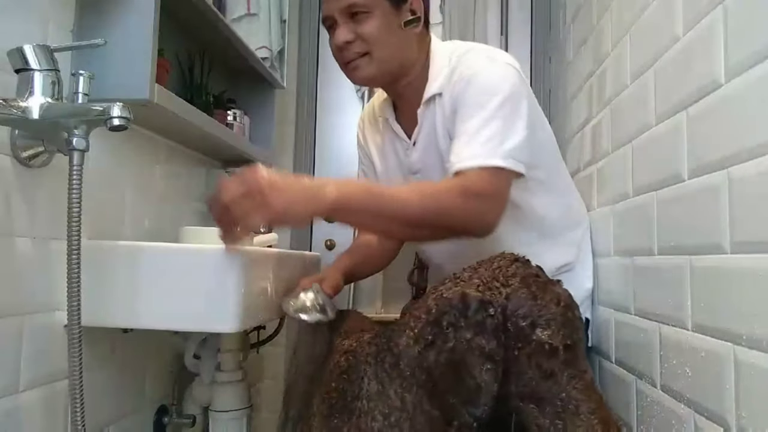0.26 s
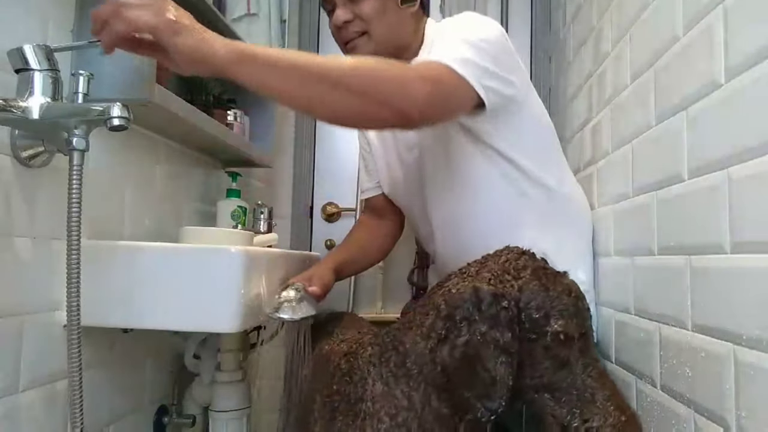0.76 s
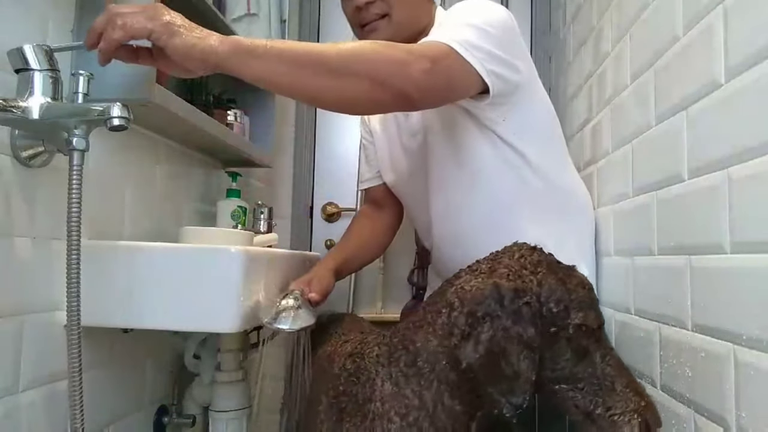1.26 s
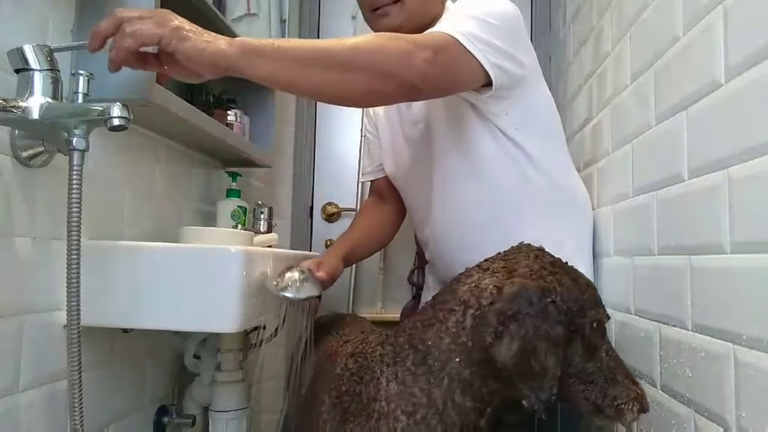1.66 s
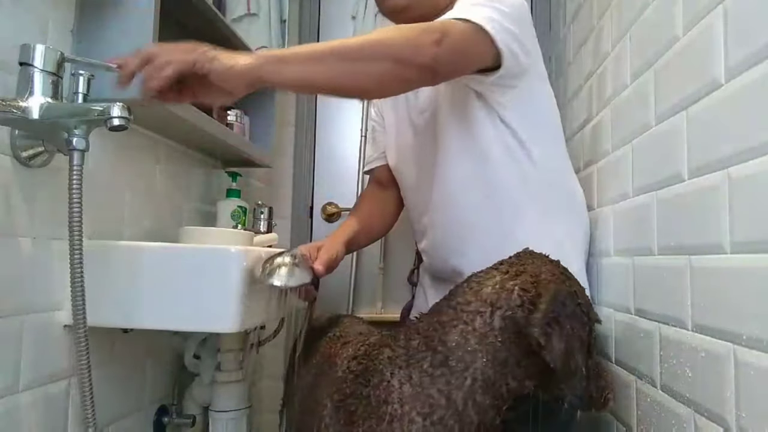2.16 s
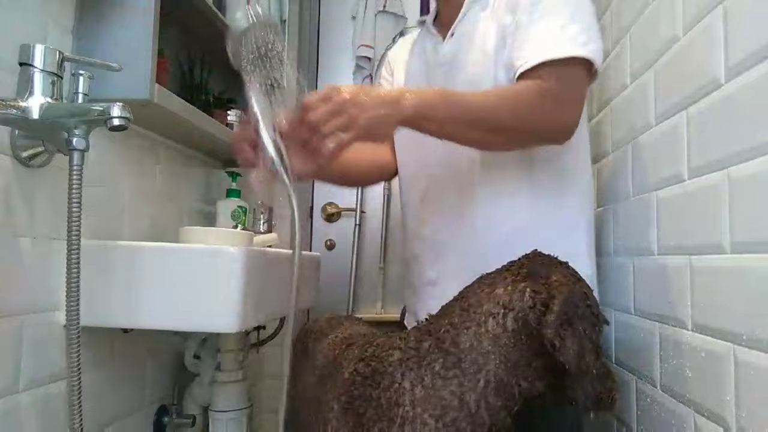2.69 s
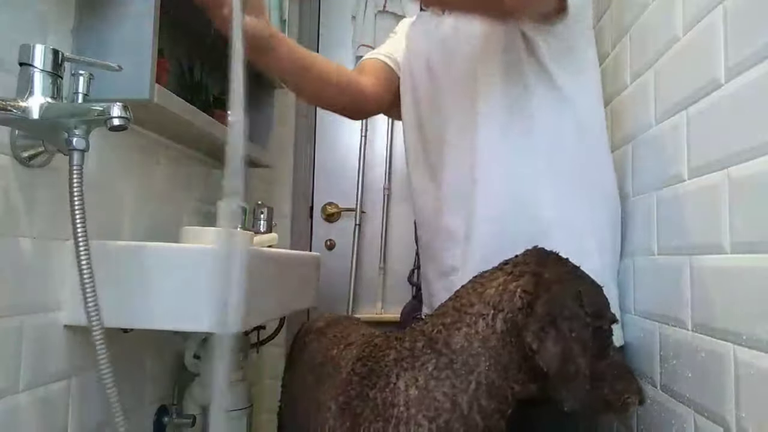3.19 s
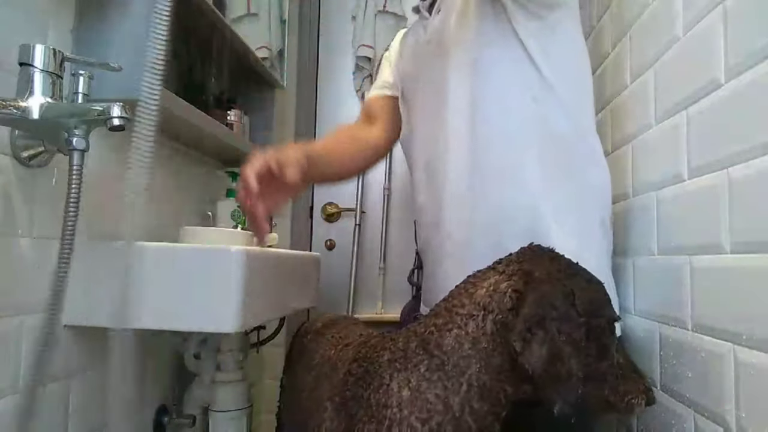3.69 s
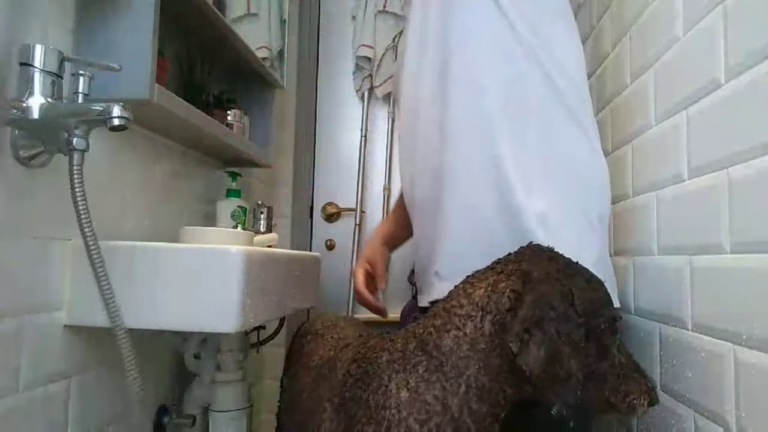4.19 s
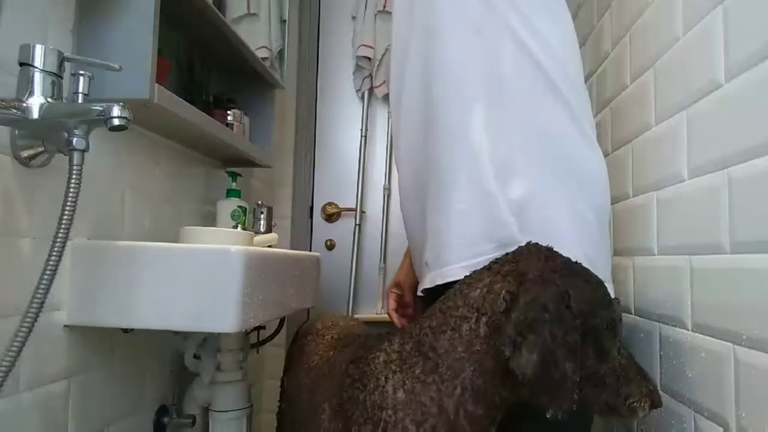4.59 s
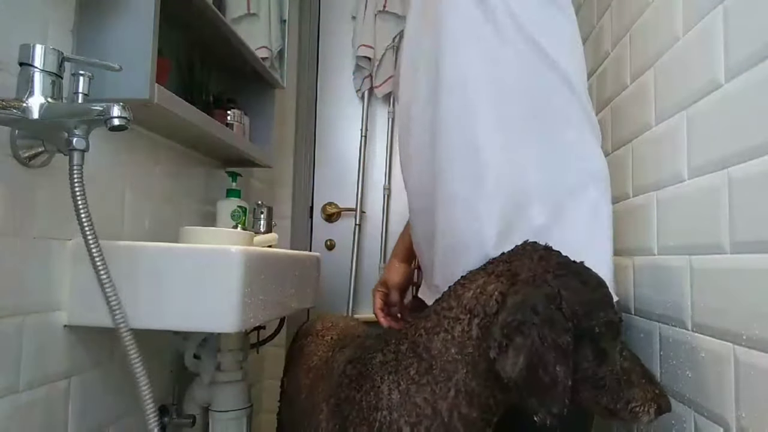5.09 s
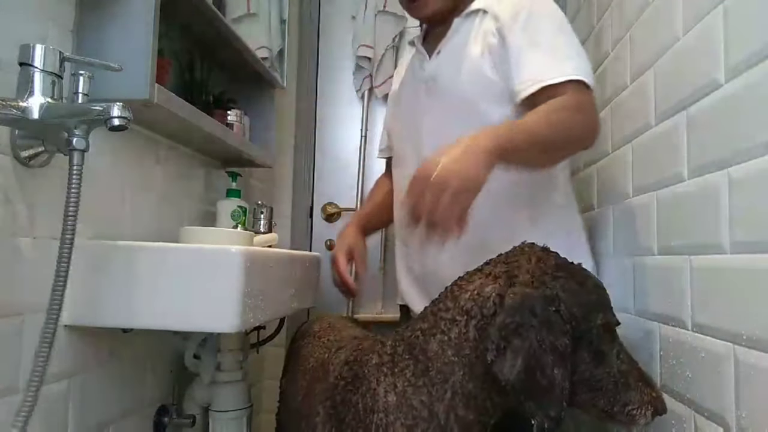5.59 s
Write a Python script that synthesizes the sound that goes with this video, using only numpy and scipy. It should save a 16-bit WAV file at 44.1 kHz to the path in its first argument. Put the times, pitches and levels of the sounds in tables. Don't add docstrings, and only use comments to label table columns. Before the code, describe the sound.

A small, hard tiled bathroom heard through a close phone microphone, bright around the upper treble, with faint low room hum. At first only weak dribble and a few spurts; from about 0.5 s a hand shower hisses in uneven bursts onto a dog's soaked coat, with crisp spatters near 0.55, 0.8, 1.1 and 1.3 s, run-off pattering and bubbly, squirting gurgles. Around 1.5 s the jets drop to a thin trickle, with drain gurgles and a splash near 2.05 s. From 2.4 to 4.2 s it is nearly quiet: tiny separate drips and soft boomy bumps and shuffles. At 4.28 s the ribbed metal hose slaps and clinks on tile with a slop of water; a harder clatter and scrape comes at 4.67 s, rattling until about 4.9 s. Sparse drips follow, with a lone tick near 5.1 s and a dull thump near 5.4 s. Echoes are very short.

```python
import sys
import numpy as np
from scipy import signal
from scipy.io import wavfile
from scipy.ndimage import uniform_filter1d

SR = 44100
rng = np.random.default_rng(int(sys.argv[2]) if len(sys.argv) > 2 else 0)


def boost(x):
    u = np.asarray(x, float) / 20
    return 10 ** u


def inscribe(sig):
    pcm = np.round(np.clip(np.atleast_2d(sig).T, -1, 1) * 32767)
    wavfile.write(sys.argv[1], SR, pcm.astype(np.int16))


N = 257984
FRAME_S = np.arange(N // 64 + 8) * 64 / SR

GATE_HZ = [1000, 2500, 5000, 7700, 9500, 12000, 15700]


def evened(x):
    return x / np.sqrt(np.mean(x ** 2) + 1e-20)


def read(points, hz):
    f, value = np.transpose(points)
    return np.interp(np.log(hz + 1), np.log(f + 1), value)


def add(mix, s, sound):
    part = mix[round(s * SR):][:len(sound)]
    part += sound[:len(part)]


def together(*db):
    return np.sqrt(sum(boost(d) ** 2 for d in db))


def column(tables, t, order, silent=-110):
    out = np.full(len(t), float(silent))
    for rows in tables:
        rows = np.array(rows)
        inside = (t >= rows[0, 0]) & (t <= rows[-1, 0])
        out[inside] = np.interp(t[inside], rows[:, 0], rows[:, order])
    return out


def drifting(noise, bins, frames):
    return evened(uniform_filter1d(uniform_filter1d(noise, size=bins, axis=0), size=frames, axis=1))


def resonate(x, hz, width):
    turn = np.exp(2j * np.pi * np.cumsum(hz * np.ones(len(x))) / SR)
    r = np.exp(-np.pi * width / SR)
    return 2 * (turn * signal.lfilter([1 - r], [1, -r], x / turn + 1e-18)).real


def droplets(per_s, spread_db, share):
    hit = rng.random(N) < per_s / SR
    size = boost(spread_db * np.minimum(rng.exponential(1, N), 4)) * hit
    grain = rng.standard_normal(120) * np.exp(-np.arange(120) / 25)
    share = np.clip(share, 0, 1)
    impacts = evened(signal.oaconvolve(size, grain)[:N])
    return evened(share * impacts + (1 - share) * rng.standard_normal(N))


def banded(x, gains, patchy_db):
    # frequency in Hz, level in dB per Hz.
    jet_colour = [(590, -47), (1000, -34.5), (1160, -42), (1430, 1.5), (2000, -3), (2660, -6), (3850, -8.5),
                  (4850, -6), (6320, -3.5), (11500, -21.5), (12600, -21), (15700, -23)]
    bin_hz = np.fft.rfftfreq(256, 1 / SR)
    z = signal.stft(x, nperseg=256, noverlap=192)[2]
    patches = drifting(rng.standard_normal(z.shape), bins=4, frames=30)
    z = z / np.sqrt(np.mean(abs(z) ** 2, axis=1, keepdims=True)) * boost(patchy_db * patches)
    shape = np.zeros(z.shape)
    for lo, hi, gain in zip(GATE_HZ, GATE_HZ[1:], gains):
        band = uniform_filter1d(1. * (bin_hz >= lo) * (bin_hz < hi), size=3)
        tint = boost(read(jet_colour, bin_hz)) * band
        shape += np.outer(tint / np.linalg.norm(tint), gain[:z.shape[1]])
    return signal.istft(z * shape, nperseg=256, noverlap=192)[1][:N]


def room_tone():
    # frequency in Hz, level in dB per Hz.
    room_colour = [(12, -47), (20, -36.5), (107, -4), (126, -10.5), (283, -27.5), (418, -25.5), (481, -29),
                   (710, -29.5), (913, -36.5), (1110, -35.5), (1240, -39.5), (1990, -41), (4230, -46.5),
                   (6610, -44), (15700, -65)]
    room_db = -56
    frames, hz = N // 512 + 6, np.fft.rfftfreq(2048, 1 / SR)
    a, b, noise = rng.standard_normal((frames, 1025, 3)).T
    patches = drifting(noise, bins=40, frames=6)
    modes_db = 2.95 * np.exp(-((hz - 100) / 18) ** 2)
    modes_db -= 7.4 * np.exp(-((hz - 140) / 18) ** 2)
    modes_db += 5.5 * np.exp(-((hz - 190) / 30) ** 2)
    colour_db = np.maximum(read(room_colour, hz), -59) + modes_db
    z = (a + 1j * b) * boost(colour_db[:, None] + 2.0 * patches * (hz > 300)[:, None])
    return boost(room_db + 2.5) * evened(signal.istft(z, nperseg=2048, noverlap=1536)[1][:N])


def shuffles():
    # time in seconds, level in dB, pitch in Hz.
    puffs = [(0.105, -59, 143), (0.469, -46, 143), (0.742, -50, 159), (0.867, -55, 143), (1.508, -47, 143),
             (1.79, -49, 183), (1.838, -47, 180), (2.1, -47, 180), (2.764, -52, 143), (2.937, -42.5, 151),
             (3.099, -49, 148), (3.208, -46, 153.4), (3.568, -47, 143), (3.694, -46.5, 143),
             (3.765, -46, 155), (3.924, -49, 176), (4.28, -36.5, 141), (4.35, -43, 170), (4.674, -43, 392),
             (4.835, -39.5, 184), (5.004, -47, 170), (5.078, -49.5, 173), (5.376, -47, 144),
             (5.746, -46, 180)]
    out, count = np.zeros(N), round(.07 * SR)
    for s, db, hz in puffs:
        puff = resonate(resonate(rng.standard_normal(2 * count), hz, 70), hz, 140)[count:]
        add(out, max(s - .015, 0), boost(db - 11.0) * evened(puff) * np.hanning(count))
    return out


def bumps():
    # time in seconds, peak in dB.
    mode_knocks = [(0.33, -47), (0.475, -29.5), (0.629, -34.5), (0.861, -36.5), (0.932, -40.5),
                   (1.148, -42), (1.562, -43), (1.694, -43), (2.247, -45), (2.761, -40), (2.848, -38.5),
                   (2.895, -36.5), (3.004, -40), (3.107, -36.5), (3.161, -36), (3.33, -44), (3.383, -35),
                   (3.419, -41), (3.51, -46), (4.149, -41.5), (3.482, -45.5), (3.576, -37), (3.652, -35.5),
                   (3.746, -36), (3.946, -39), (4.266, -33.5), (4.636, -43), (4.81, -45.5), (4.999, -46),
                   (5.085, -41), (5.383, -30), (5.501, -40), (5.547, -39.5), (5.659, -40), (5.738, -33.5)]
    # time in seconds, peak in dB, pitch in Hz.
    thuds = [(0.0063, -42, 81), (0.063, -45, 110), (2.109, -50, 53), (6.4, -44, 65), (4.105, -53, 84),
             (4.102, -35, 87.5), (4.9, -44, 51.6), (4.829, -40, 188), (4.272, -43, 172), (5.797, -51, 67),
             (1.79, -47, 66), (1.8, -42.5, 95), (1, -49, 58), (9.5, -40, 40), (2.63, -47, 92)]
    mode_hz, scatter_share = 100, .05
    knocks = [(s, db, mode_hz * (1 + scatter_share * rng.standard_normal())) for s, db in mode_knocks]
    knocks = knocks + thuds
    out, t = np.zeros(N), np.arange(round(.052 * SR)) / SR
    phases = rng.random((len(knocks), 2))
    for (s, db, hz), (a, b) in zip(knocks, phases):
        wave = np.sin(2 * np.pi * (hz * t + a))
        wave += 0.16 * np.sin(2 * np.pi * (1.683 * hz * t + b))
        wave += 0.14 * np.sin(2 * np.pi * (0.6 * hz * t + b))
        add(out, max(s - .008, 0), boost(db) * wave * np.hanning(len(t)))
    return out


def gurgle():
    # time in seconds, peak in dB,
    # pitch in Hz, length in seconds.
    blips = [(0.388, -38.5, 1544, 0.059), (0.429, -33, 2400, 0.018), (0.482, -36, 1390, 0.04),
             (0.526, -43, 1346, 0.048), (0.5735, -44, 1350, 0.055), (0.686, -44, 1570, 0.063),
             (0.9, -42.5, 1560, 0.08), (0.946, -39.5, 1800, 0.03), (1.056, -29, 1630, 0.069),
             (1.118, -37, 1360, 0.12), (1.235, -35, 2300, 0.022), (1.449, -42.5, 1730, 0.05),
             (1.663, -39.5, 2100, 0.037), (1.734, -42.5, 2140, 0.066), (1.826, -34, 1580, 0.12),
             (1.892, -38, 1496, 0.18), (2.085, -36.5, 2560, 0.1), (2.103, -39.5, 1426, 0.12),
             (2.1506, -38.5, 2280, 0.054), (2.271, -40, 2410, 0.053), (2.32, -46, 1440, 0.026),
             (3.986, -57, 1510, 0.048), (4.387, -37, 2600, 0.018), (5.513, -52, 1900, 0.03),
             (0.21, -45, 3260, 0.057), (0.454, -34.5, 3470, 0.072), (0.532, -31, 4440, 0.12),
               (0.634, -29, 4300, 0.054), (0.715, -34, 3950, 0.04), (1.76, -42, 3120, 0.059),
               (1.8606, -36, 3030, 0.069), (2.075, -37, 2950, 0.053), (4.09, -53.5, 2800, 0.059),
               (5.695, -48, 3300, 0.022)]
    # time in seconds, level in dB, length in seconds.
    hums = [(0.157, -62, 0.079), (0.664, -59, 0.074), (1.063, -56.5, 0.023), (1.206, -58.5, 0.041),
            (1.271, -60, 0.049), (1.309, -51.5, 0.15), (2.033, -52.5, 0.046), (2.083, -62.5, 0.12),
            (2.209, -49, .095)]
    # time in seconds, level in dB, pitch in Hz, length in seconds.
    squeaks = [(0.061, -67, 1350, 0.13), (0.165, -59, 1475, 0.11), (0.428, -65, 540, 0.055),
               (1.691, -67, 546, .04), (5.419, -69, 1900, 0.035), (5.784, -63, 692, 0.06)]
    drain_hz, width_share = 898, .065
    out, age_s = np.zeros(N), np.arange(8000) / SR
    for s, db, hz, length_s in blips:
        width_hz = .1 * hz * max(hz / 1400, 1)
        glide_hz = hz * (0.977 + 0.32 * age_s)
        ring = resonate(rng.standard_normal(len(age_s)), glide_hz, width_hz)
        ring = evened(resonate(ring, glide_hz, 3 * width_hz))
        decay_db = 25 * age_s / np.clip(length_s, .015, .09)
        add(out, s, boost(db - 7.5 - decay_db) * np.clip(age_s / 0.002, 0, 1) * ring)
    drain = [(s, db, drain_hz, length_s) for s, db, length_s in hums]
    for s, db, hz, length_s in drain + squeaks:
        count = round(np.clip(length_s, .015, .17) * SR)
        ring = resonate(rng.standard_normal(len(age_s)), hz, width_share * hz)
        ring = resonate(ring, hz, 2 * width_share * hz)[-count:]
        add(out, s, boost(db) * evened(ring) * signal.windows.tukey(count, .6))
    return out


def sweeps():
    # time in seconds, level in dB, start in Hz, end in Hz, length in seconds.
    slides = [(0.25, -50.5, 1830, 3100, 0.078), (0.38, -54, 1800, 3300, 0.077),
              (0.534, -40, 4440, 4700, 0.038), (1.015, -40, 4800, 5100, 0.028),
              (1.178, -53, 3300, 3800, 0.018), (1.301, -46, 3200, 4100, .05), (3.092, -62, 2100, 2360, .05),
              (3.097, -60.5, 3400, 3100, 0.044), (3.14, -58, 2140, 3200, 0.073),
              (3.23, -69, 3700, 2900, 0.1), (3.4, -70, 1400, 1500, .1), (2.635, -68, 2100, 2000, .035),
              (0.645, -53, 3600, 3700, .16), (0.3, -50, 5000, 5600, .03), (4.383, -49.5, 2600, 7500, .04),
              (2.813, -65.5, 4700, 3600, 0.046), (5.242, -72, 1800, 1900, 0.089),
              (5.41, -71, 3800, 4000, 0.044), (5.683, -61, 3200, 3400, 0.028),
              (5.51, -63, 2800, 1800, 0.029)]
    out, drive = np.zeros(N), droplets(per_s=900, spread_db=3.5, share=.6)
    for s, db, from_hz, to_hz, length_s in slides:
        count = round(np.clip(length_s, .015, .2) * SR)
        hz = np.geomspace(from_hz, to_hz, count)
        width_hz = .3 * (from_hz + to_hz) / 2
        ring = resonate(resonate(drive[round(s * SR):][:count], hz, width_hz), hz, 2 * width_hz)
        add(out, s, boost(db) * evened(ring) * signal.windows.tukey(count, .4))
    return out


def clinks():
    # time in seconds, peak in dB, pitch in Hz, t60 in seconds.
    rib_hits = [(4.2768, -20.5, 4456, 0.083), (4.287, -23, 4620, 0.067), (4.279, -25, 2530, .05),
                (4.311, -28, 5500, .05), (4.311, -28, 7000, .04), (4.331, -40, 2890, 0.057),
                (4.334, -28, 5380, .08), (4.3865, -33, 2400, 0.034), (4.4095, -40, 2900, 0.055),
                (4.443, -35, 5800, 0.12), (4.4728, -42, 3050, 0.061), (4.49, -39, 4020, 0.072),
                (4.5123, -37, 5430, .08), (4.421, -34, 8200, .05), (4.638, -26, 4690, 0.084),
                (4.6584, -20.5, 4770, 0.045), (4.6734, -22, 4800, .07), (4.6734, -19, 6400, 0.069),
                (4.674, -38, 2460, 0.055), (4.673, -34.5, 1300, .08), (4.671, -32, 906, .08),
                (4.7587, -34, 2920, 0.11), (4.7587, -34, 4800, .06), (4.7796, -30.5, 6400, .06),
                (4.799, -28, 2950, 0.09), (4.803, -28, 4700, 0.11), (4.8135, -29, 2370, .04),
                (4.825, -28, 4770, 0.15), (4.826, -30, 2780, .1), (4.833, -26.5, 6300, 0.092),
                (4.855, -29, 7500, 0.081), (4.862, -35, 4300, .07), (4.9313, -30.5, 7330, 0.025),
                (5.0955, -35, 5980, .06)]
    tick_db = -5
    out, t = np.zeros(N), np.arange(5000) / SR
    draws = rng.standard_normal((len(rib_hits), 7, 2))
    for (s, db, hz, t60_s), draw in zip(rib_hits, draws):
        ring = sum(np.sin(2 * np.pi * ((hz + 130 * d) * t + p)) for d, p in draw)
        ring = ring * boost(-60 * t / np.clip(t60_s, .02, .1)) * np.clip(t / .0006, 0, 1)
        tick = np.diff(rng.standard_normal(len(t) + 1)) * np.exp(-t / .0012)
        add(out, s, boost(db - 6.0) * (ring / abs(ring).max() + boost(tick_db) * tick / abs(tick).max()))
    return out


def hose_ring(x):
    # frequency in Hz, level in dB, t60 in seconds.
    modes = [(900, -8, 0.124), (1100, 0, 0.031), (1257, 3, 0.05), (1900, 0.5, 0.012), (2260, 1.5, 0.0062),
             (3020, 2.5, 0.064), (4015, 2, 0.056), (4670, 9.5, 0.03), (5630, 1, 0.069), (6870, -2, 0.048),
             (7320, -3.5, 0.038)]
    return sum(boost(db) * resonate(resonate(x, hz, 3.6 / t60_s + 60), hz, 460) for hz, db, t60_s in modes)


def slaps():
    # time in seconds, peak in dB, low body (around 370 Hz) in dB.
    slap_hits = [(4.2782, -18.5, -50), (4.3481, -33, -69), (4.4092, -51, -62), (4.6379, -29, -63),
                 (4.659, -25, -80), (4.6723, -12, -41.5), (4.8018, -23.5, -66), (4.8396, -23, -55),
                 (5.0955, -33, -53)]
    # loudest time in seconds, level in dB, rise in dB per s, fall in dB per s.
    scrapes = [(4.279, -29, 9003, 326), (4.675, -14, 2500, 600), (4.868, -33, 210, 900)]
    t, now = np.arange(4000) / SR, np.arange(N) / SR
    drag = together(*(db - np.maximum(rise * (s - now), fall * (now - s)) for s, db, rise, fall in scrapes))
    out = boost(-6.5) * drag * evened(hose_ring(droplets(per_s=1300, spread_db=2.5, share=0.96)))
    for s, db, body_db in slap_hits:
        rings = hose_ring(rng.standard_normal(len(t)) * np.exp(-t / 0.0098) + 5.5 * (t == 0))
        push = resonate(rng.standard_normal(len(t)), 370, 150) * np.exp(-t / .03)
        rattle = boost(db - 12) * rings / abs(rings).max()
        add(out, s, rattle + boost(body_db - 2.5) * push / abs(push).max())
    return out


def gate(s):
    tail_s = [0.32, 0.19, 0.27, 0.2, 0.3, 0.24]
    age_s, near = FRAME_S - s, 4.25 < s < 5.05
    rise = np.clip((age_s + .001) / (.002 if near else .005), 0, 1)
    t60_s = np.array(tail_s)[:, None] * (0.67 if near else 1)
    return rise * boost(-60 * np.maximum(age_s - .008, 0) / t60_s)


def splashes():
    # time in seconds, peak in dB, heavy drops and finest drops in dB re peak.
    spurts = [(0.067, -35, -13.5, -47), (0.163, -34, -33, -38), (0.414, -33.5, -5, -45),
              (0.4594, -34.5, -3, -13), (0.537, -20.5, -44, -48), (0.632, -26, -11, -38),
              (0.799, -19.5, -15, -33), (0.834, -21.5, -19.5, -27), (1.12, -22.5, -8.5, -31),
              (1.2067, -41, -29, -21), (1.325, -24.5, -11, -26), (1.805, -36, -11, -35),
              (1.8614, -42, -26, -41), (2.0544, -29.5, -32, -49), (2.427, -39.5, -15, -42)]
    drips = [(2.477, -38.5, -1.5, -47), (2.486, -36, -7, -55), (2.566, -43.5, -10.5, -23),
             (2.707, -49, -12, -11), (2.803, -46, -15, -32), (2.953, -41.5, -17.5, -29),
             (3.02, -44.5, -20, -28), (3.0734, -56, -11, -5), (3.205, -35, -16, -37), (3.33, -56, -9, -23),
             (3.477, -51.5, -15, -17), (3.7534, -60.5, 0.5, -26), (3.7878, -52, -14, -33),
             (3.8357, -46, -26, -27), (3.881, -47.5, -43, -19), (3.9749, -59.5, -7, 2),
             (4.108, -40.5, -32, -35), (4.181, -40, -14, -9.5), (4.242, -41, -10, -15),
             (5.0898, -32.5, -10, -28), (5.343, -41, -33, -42), (5.4335, -56, -9, -27),
             (5.462, -44, -22, -20), (5.4869, -44.5, -17, -33), (5.538, -48, -15, -5),
             (5.59, -45, -25, -19), (5.663, -45, -38, -60), (5.79, -48, -20, -55)]
    slops = [(4.277, -22.5, -5.5, -21.5), (4.309, -29.5, -6, -13.5), (4.329, -30.5, -1.5, -29),
             (4.3864, -52, 7, -20), (4.4095, -39, -12, -25), (4.421, -39, -20, -13), (4.443, -42, -23, -31),
             (4.4728, -39, -2, -15), (4.512, -36.5, -13, -16.5), (4.548, -44, -16, -28),
             (4.606, -45, -6.5, -24), (4.635, -33.5, -2.5, -25), (4.6564, -28, -8, -27),
             (4.671, -18, -10, -33), (4.742, -33.5, -12, -15), (4.758, -36.5, -3, -26),
             (4.7796, -31.5, -7, -19), (4.799, -31.5, -14, -17), (4.825, -29.5, -3, -17.5),
             (4.851, -30.5, -8.5, -15), (4.93, -40, -12, -4), (4.953, -51.5, -14, -4), (5.032, -70, -10, 0)]
    # time in seconds, peak in dB, band index 2-5.
    sprinkles = [(2.7085, -49, 5), (2.8828, -59, 3), (2.9545, -52, 3), (3.206, -55, 3), (3.478, -58, 5),
                 (3.6795, -64, 4), (3.7878, -62, 3), (3.882, -56, 5), (3.9749, -60, 4), (4.109, -52, 3),
                 (4.111, -51, 4), (4.421, -36.5, 3), (5.3443, -60, 4), (5.5907, -58, 5), (5.5907, -52, 3),
                 (5.538, -59, 3), (5.462, -72, 3), (0.163, -40.5, 3), (0.414, -46, 3), (3.02, -60, 3),
                 (0.5356, -36.5, 4), (1.2067, -30.5, 3), (3.478, -63.5, 2), (3.9749, -67, 3),
                 (5.0898, -56, 5), (3.29, -66, 5), (3.68, -70, 5), (5.08, -51, 2), (5.285, -60, 2)]
    fine_slope = [0.46, 0.71, 0.9]
    below_db, scatter_db = 21, 1.5
    power = np.zeros((6, len(FRAME_S)))
    for s, peak_db, heavy_db, fine_db in spurts + drips + slops:
        low_db = peak_db + heavy_db
        scatter = scatter_db * rng.standard_normal(len(fine_slope))
        high_db = peak_db - 3 + fine_db * np.array(fine_slope) + scatter
        bands_db = np.array([low_db - below_db, low_db, peak_db - 6, *high_db])
        power += (gate(s) * boost(bands_db[:, None])) ** 2
    for s, db, band in sprinkles:
        power[round(band)] += (gate(s)[round(band)] * boost(db)) ** 2
    drops = droplets(per_s=2500, spread_db=3.5, share=.25)
    return boost(-8.0) * banded(drops, np.sqrt(power), patchy_db=2.0)


def hollows():
    # frequency in Hz, width in Hz, level in dB.
    cavities = [(1350, 530, -3), (1880, 200, -5.5), (2490, 600, -1), (3270, 1250, 5), (4420, 1140, 4.5)]
    drive = droplets(per_s=1100, spread_db=3.5, share=0.4)
    swell = uniform_filter1d(rng.standard_normal((len(cavities), N // 64 + 1)), size=40, axis=1)
    swell = uniform_filter1d(evened(swell), size=4, axis=1)
    swell_db = 3.2 * np.repeat(swell, 64, axis=1)[:, :N]
    out = np.zeros(N)
    for (hz, width_hz, db), cavity_db in zip(cavities, swell_db):
        ring = resonate(resonate(drive, hz, width_hz), hz, 1.37 * width_hz)
        out += boost(db + cavity_db) * evened(ring)
    return evened(out)


def spray():
    # time in seconds, jets on the coat in dB, run-off pattering down in dB.
    flow = [
        [(0.0, -45, -50.5), (0.41, -44, -50), (0.5, -35.5, -61), (0.598, -32.5, -48), (0.7, -33, -49.5),
         (0.77, -35, -52), (0.93, -34, -49), (0.99, -36.5, -48), (1.06, -33.5, -42.5), (1.31, -34, -44.5),
         (1.45, -45, -47), (1.538, -54.5, -55.5), (1.95, -52, -49.5), (2.122, -51, -47.5), (2.34, -53, -53),
         (2.42, -59.5, -64.5), (3.016, -68.5, -82), (3.2, -64, -69)],
        [(4.24, -75, -110), (4.278, -45.5, -46), (4.615, -63, -69.5)],
        [(4.62, -87, -85), (4.682, -56, -37.5), (4.98, -65, -100)],
    ]
    full_db, fizz_db, fizz_growth, mist_db = -32.5, -36.5, 2, -59.5
    runoff_ref_db, runoff_follow, runoff_fizz_db, runoff_mist_db = -47, 0.53, -60.5, -65
    lift_s, lift_db = 1.6, 4.5
    flicker_db = 1.1 * evened(uniform_filter1d(rng.standard_normal(len(FRAME_S)), size=14))
    jets_db = column(flow, FRAME_S, order=1)
    runoff_db = column(flow, FRAME_S, order=2, silent=-140)
    hard_db = jets_db - full_db
    spatter_db = runoff_follow * np.minimum(runoff_db - runoff_ref_db, 6.0) + lift_db * (FRAME_S > lift_s)
    patter = boost(runoff_db + flicker_db)
    fizz = boost(flicker_db) * together(fizz_db + fizz_growth * hard_db, runoff_fizz_db + spatter_db)
    mist = boost(flicker_db) * together(mist_db + hard_db, runoff_mist_db + spatter_db)
    gains = [boost(-11) * patter, boost(-5.5) * patter, boost(jets_db + flicker_db),
             boost(-1.5) * fizz, np.hypot(boost(-6.0) * fizz, boost(-2) * mist), mist]
    hiss = boost(-4.5) * banded(droplets(per_s=1300, spread_db=3.5, share=0.21), gains, patchy_db=1.9)
    return hiss + boost(-4.0) * np.interp(np.arange(N) / SR, FRAME_S, patter) * hollows()


def tiles(x, t60_s):
    at = np.arange(150, 9000, 22)
    taps = np.zeros(9100)
    jittered = at + rng.integers(0, 22, len(at))
    taps[jittered] = rng.choice([-1., 1.], len(at)) * boost(-60 * at / SR / t60_s)
    return signal.oaconvolve(x, taps / np.linalg.norm(taps))[:N]


def scene():
    wet = gurgle() + slaps() + clinks() + sweeps()
    water = spray() + splashes() + bumps() + room_tone()
    echo = boost(-5) * tiles(wet, t60_s=.14)
    return (wet + echo + water + shuffles())[None]


def starve(x, margin_db, share):
    z = signal.stft(x, nperseg=512, noverlap=384)[2]
    hz = np.fft.rfftfreq(512, 1 / SR)
    top = hz > GATE_HZ[-2]
    jets = (hz > GATE_HZ[2]) & (hz < GATE_HZ[3])
    top_db, jets_db = (10 * np.log10(uniform_filter1d((abs(z[b]) ** 2).mean(0), size=8) + 1e-20)
                       for b in (top, jets))
    patches = drifting(rng.standard_normal(z.shape), bins=5, frames=22)
    masked = np.clip(share * (jets_db - top_db - margin_db) + patches - 2.5, 0, 1)
    faint_db = np.percentile(top_db, 11) - top_db
    lost = np.clip(.4 * faint_db + patches + (hz[:, None] - 14800) / 1000, 0, 1) * (faint_db > 0)
    cut_db = -35 * np.maximum(masked, lost) * top[:, None]
    return signal.istft(z * boost(cut_db), nperseg=512, noverlap=384)[1][:N]


def top_cut(x):
    return signal.sosfilt(signal.butter(12, 16610, fs=SR, output="sos"), x)


def record(dry):
    edge = signal.firwin(301, 15700, window=("kaiser", 8), fs=SR)
    thin = starve(dry[0], margin_db=22, share=.25)
    mix = signal.oaconvolve(thin, edge, "same")[None]
    return top_cut(mix)


dry = scene()
out = record(dry)
inscribe(out)
```